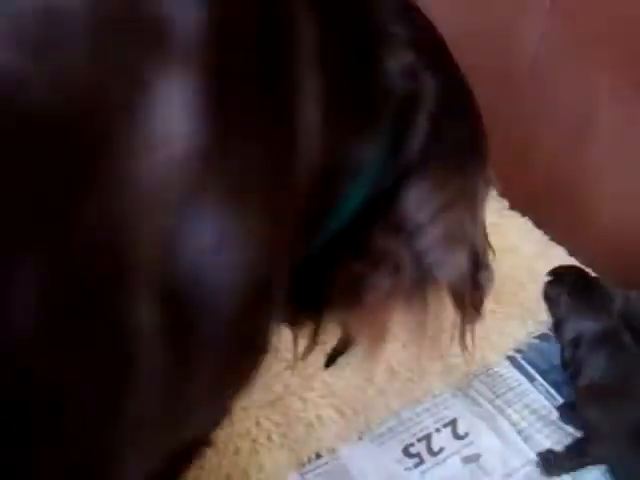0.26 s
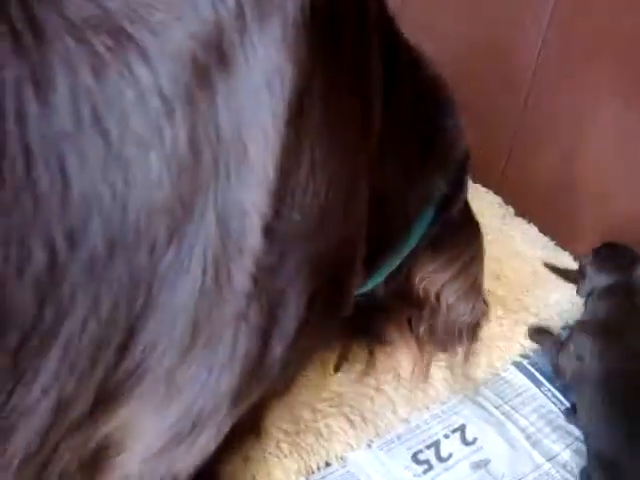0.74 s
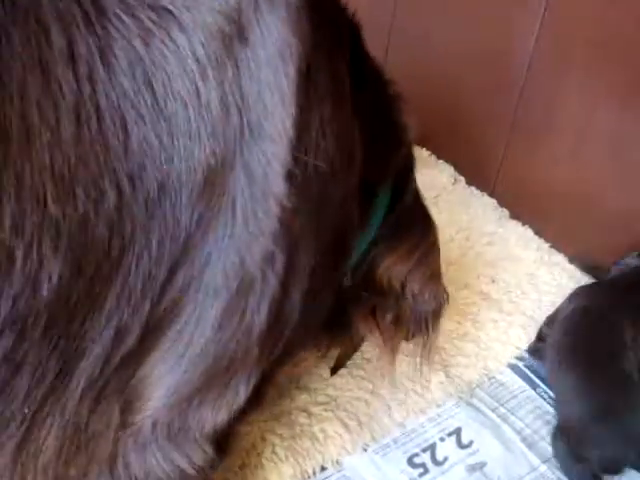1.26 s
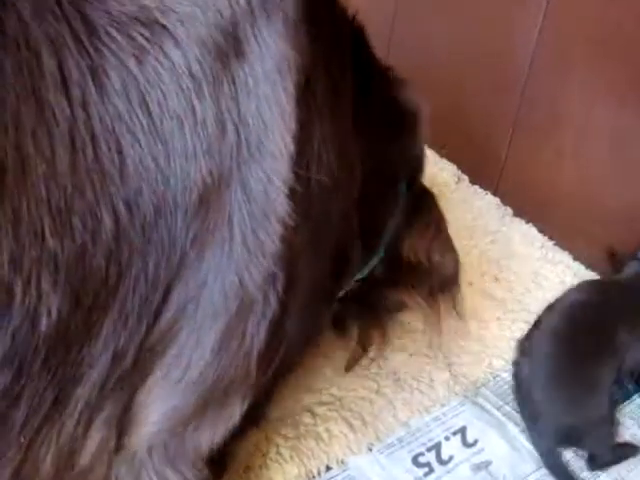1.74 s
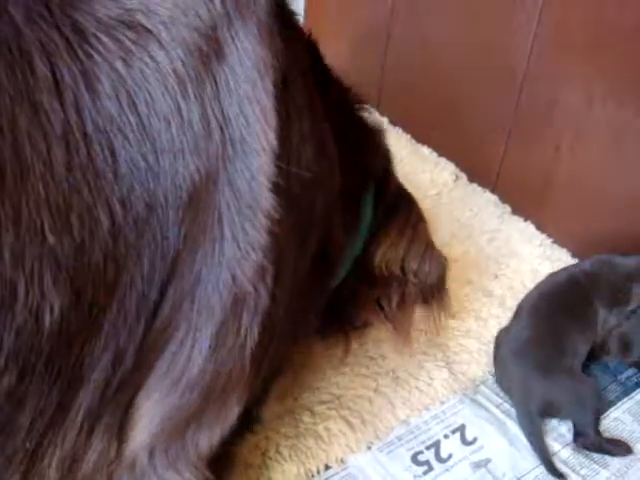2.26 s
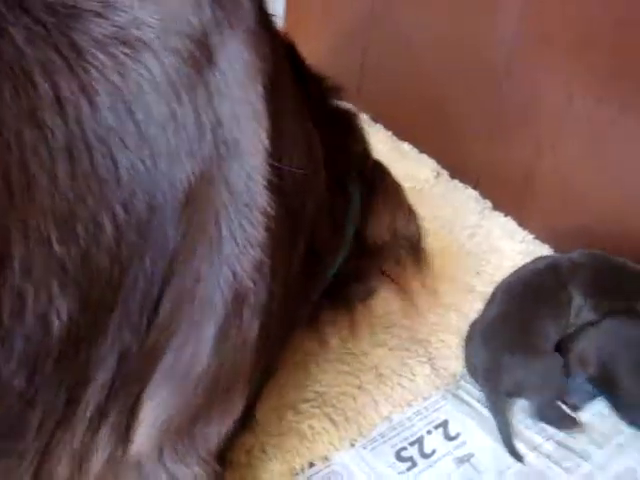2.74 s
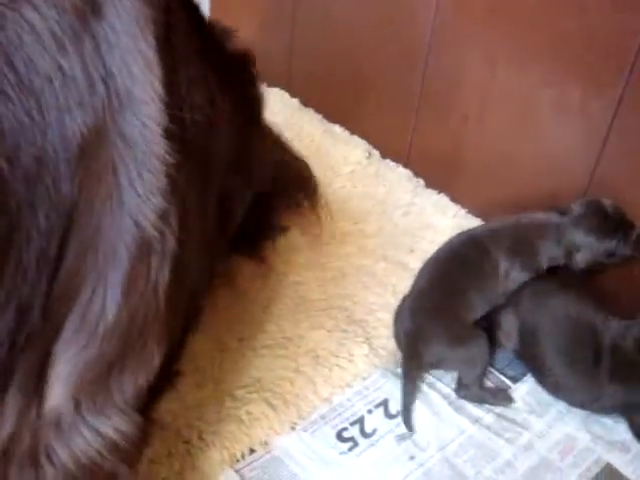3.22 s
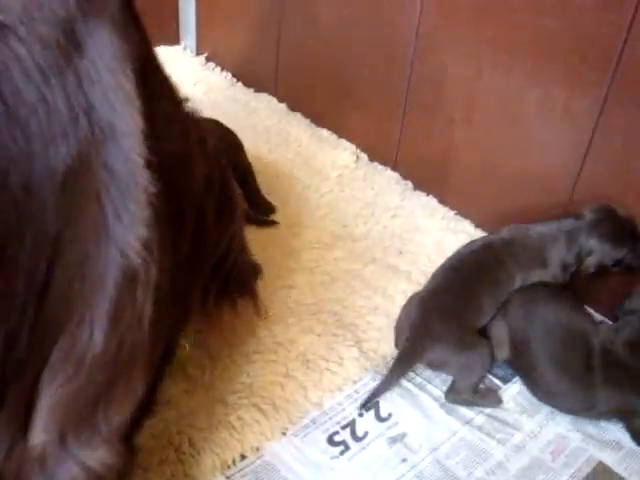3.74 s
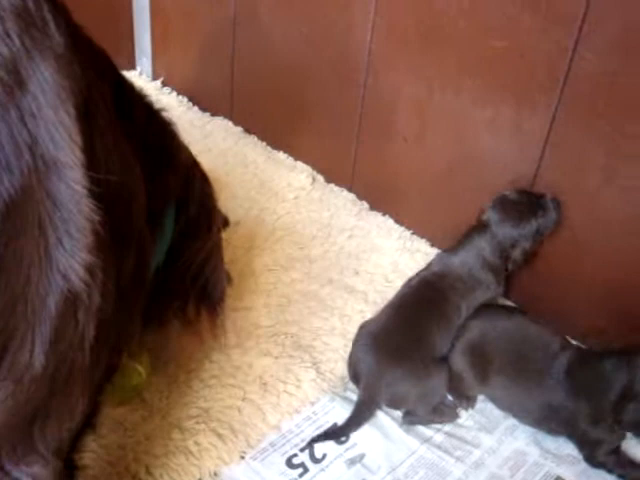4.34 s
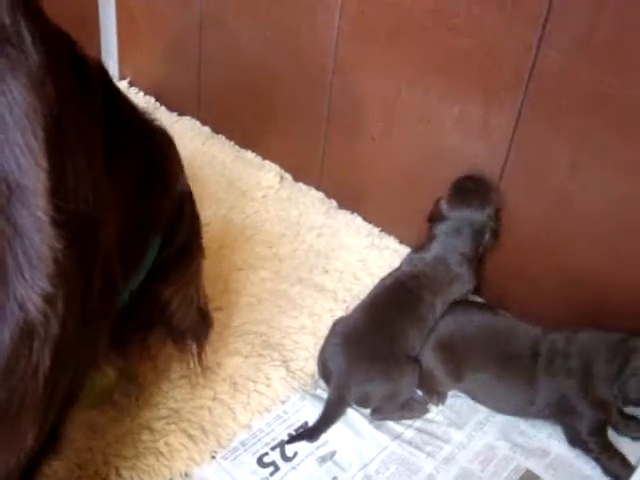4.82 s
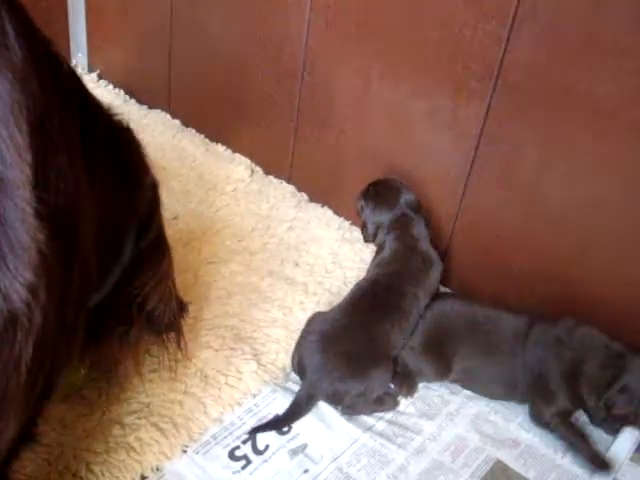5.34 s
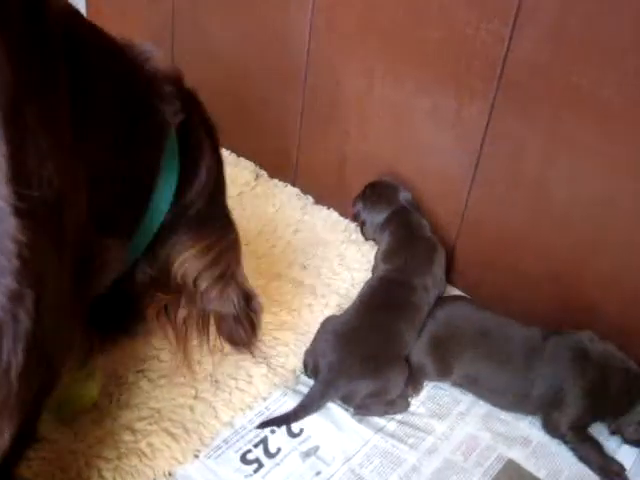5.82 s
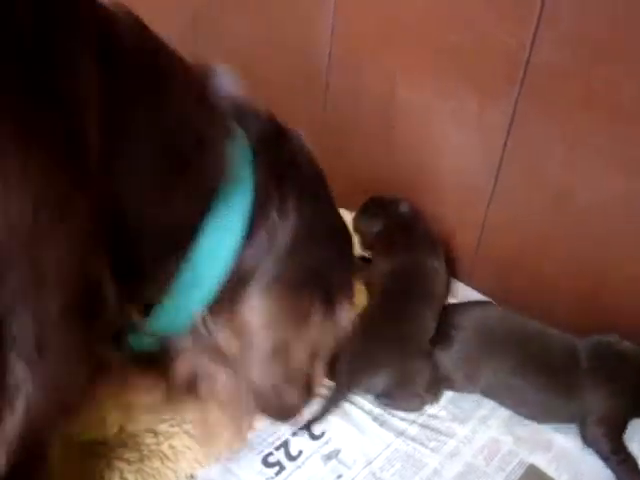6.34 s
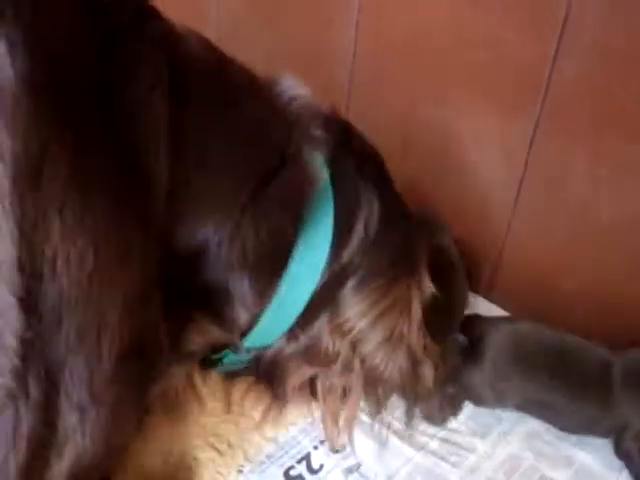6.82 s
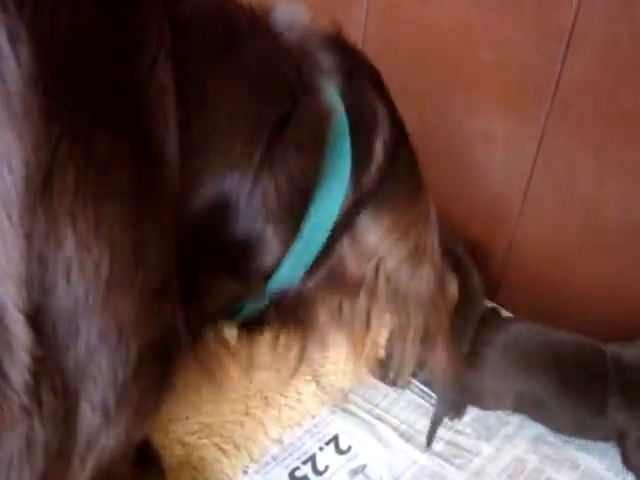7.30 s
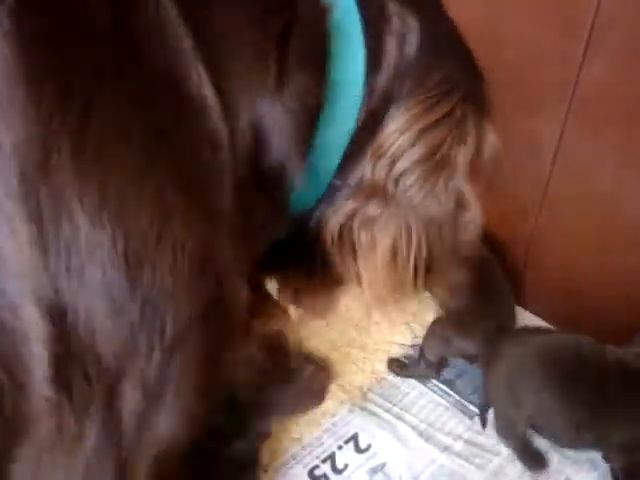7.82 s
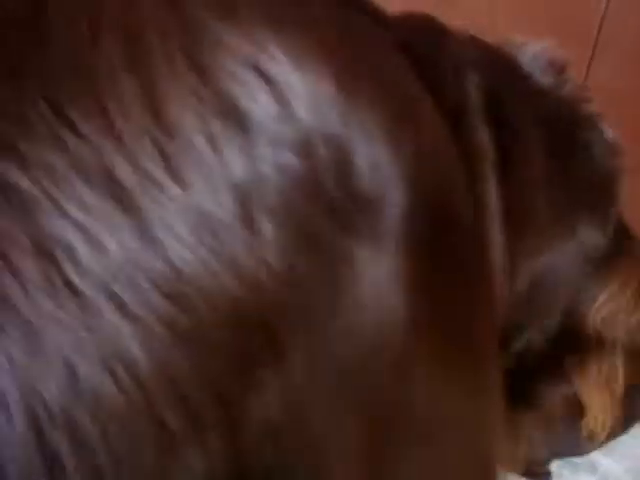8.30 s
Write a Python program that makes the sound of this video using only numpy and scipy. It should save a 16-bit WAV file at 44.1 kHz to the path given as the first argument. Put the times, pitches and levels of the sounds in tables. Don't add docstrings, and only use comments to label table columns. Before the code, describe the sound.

Close-up litter of tiny pups whining in unsteady high squeaks while fur, fleece and paper rustle and snap, a brief metal clink, then a loud yelp.

```python
import sys
import numpy as np
from scipy import signal
from scipy.fft import rfft, irfft, next_fast_len
from scipy.io import wavfile
from scipy.ndimage import uniform_filter1d, minimum_filter1d, map_coordinates

SR = 44100
rng = np.random.default_rng(int(sys.argv[2]) if len(sys.argv) > 2 else 0)


def invert_db(x):
    u = np.asarray(x, float) / 20
    return 10 ** u


def unload_wav(signal):
    wavfile.write(
        sys.argv[1],
        SR,
        np.round(np.clip(np.atleast_2d(signal).T, -1, 1) * 32767).astype(np.int16),
    )


N = 377496
TOP_HZ = 10200


def unit(x):
    return x / np.sqrt(np.mean(x ** 2) + 1e-20)


def along(points, hz):
    f, v = np.transpose(points)
    return np.interp(np.log(hz + 1), np.log(f + 1), v)


def wobble(rate_hz, size=N):
    knots = rng.standard_normal(int(size * rate_hz / SR) + 4)
    return map_coordinates(knots, [np.arange(size) * rate_hz / SR])


def filtered(x, response):
    m = next_fast_len(N + SR // 2)
    return irfft(rfft(x, m) * response(np.fft.rfftfreq(m, 1 / SR)), m)[..., :N]


def level(rows):
    return invert_db(np.interp(np.arange(N) / SR, *np.transpose(rows)))


def rush(spectrum, patchy_db, grit_db):
    z = signal.stft(rng.standard_normal(N + 512), nperseg=512)[2]
    field = uniform_filter1d(rng.standard_normal(z.shape), size=8, axis=0)
    field = uniform_filter1d(field, size=5, axis=1)
    patches = invert_db(patchy_db * np.clip(unit(field), -2, 2))
    noise = signal.istft(z * patches, nperseg=512)[1][:N]
    return unit(filtered(noise * invert_db(grit_db * wobble(700)), lambda hz: invert_db(along(spectrum, hz))))


# pitch_hz [Hz], level_db [dB]
SECOND = [(260, -2.5), (400, 2.5), (570, 4), (750, -6.5), (1000, -8.5), (1200, -21), (1500, -16.5)]


def unfold(calls, shape, thin_db=0):
    when, way, under_db = np.transpose(shape)
    out = []
    for start_s, length_s, peak_db, from_hz, to_hz in calls:
        hz = from_hz + way * (to_hz - from_hz)
        second_db = along(SECOND, hz) + thin_db
        out.append(np.transpose([start_s + when * length_s, hz, peak_db + under_db, second_db]))
    return out


# centre_s [s], spread_s [s], level_db [dB]
EXTRA_BRIGHT = [
    (2.0, 0.066, -8),
    (4.66, 0.099, -10),
    (6.92, 0.035, 1),
    (7.258, 0.031, 10),
]


def extra_bright_db(t):
    return sum(db * np.exp(-((t - s) / spread_s) ** 2) for s, spread_s, db in EXTRA_BRIGHT)


# centre_s [s], spread_s [s], hoarseness [0-1]
HOARSE = [(.02, .04, .6), (.15, .03, 1), (1.86, .04, .7), (2.05, .025, .7), (2.66, .03, .5), (3.0, .05, 1),
          (3.24, .055, .9), (3.49, .02, .6), (4.12, .03, .5), (4.4, .03, .5), (4.77, .015, .25),
          (5.12, .03, .4), (5.41, .05, .5), (6.25, .015, .3), (6.89, .03, .45), (2.0, .04, .2),
          (4.38, .06, .2), (5.06, .07, .3), (7.545, .05, .7), (8.345, .025, .8)]
# freq_hz [Hz], level_db [dB]
NOSE_RING = [(3000, -70), (4300, -44.5), (5000, -32), (5600, -23), (6500, -42.5), (8800, -31), (10000, -49)]


def cry(rows, throat, soft_db):
    s, hz, db, second_over_db = np.transpose(rows)
    t = np.arange(s[0] - .003, s[-1] + .037, 1 / SR)
    size = len(t)
    first_db = np.interp(t, s, db)
    second_db = np.interp(t, s, second_over_db)
    low_db = np.maximum(second_db, 0)
    pitch = uniform_filter1d(np.interp(t, s, hz), size=300)

    strain = np.clip(pitch / 200 - 5.3, 0, 1) * np.clip((first_db + low_db + 29) / 6, 0, 1)
    pitch *= 1 + .012 * wobble(55, size) + (.011 + .04 * strain) * wobble(300, size)
    hoarse = sum(depth * np.exp(-((t - at) / spread_s) ** 2) for at, spread_s, depth in HOARSE)
    pitch *= 1 + .075 * hoarse * wobble(400, size)
    phase = 2 * np.pi * np.cumsum(pitch) / SR
    effort = uniform_filter1d(np.clip((first_db + 30) / 18, 0, 1), size=1300)

    k = np.arange(1, 17)[:, None]
    soft = np.clip((-24 - first_db - low_db) / 10, 0, 1)
    partial_db = second_db + along(throat, k * pitch) - along(throat, 2 * pitch)
    partial_db -= (2.5 + soft_db * soft) * np.log2(k / 2)
    partial_db[0] = 0
    nose_db = low_db + 3.5 * (effort - .4) + extra_bright_db(t) + along(NOSE_RING, k * pitch)
    partial_db = np.maximum(partial_db, nose_db)
    flutter_db = 1.8 + (.25 + hoarse / 2) * np.minimum(k - 1, 5)
    partial_db += flutter_db * np.array([wobble(150, size) for _ in k])
    waves = np.sin(k * phase + rng.uniform(0, 2 * np.pi, k.shape))
    voice = np.sqrt(2) * np.sum(invert_db(partial_db) * (k * pitch < TOP_HZ) * waves, axis=0)

    rasp = 1 + (.055 + .0065 * effort + .35 * hoarse) * wobble(900, size)
    edges = np.clip((t - t[0]) / .002, 0, 1) * invert_db(-1500 * np.clip(t - s[-1], 0, None))
    return max(round(t[0] * SR), 0), voice * rasp * invert_db(first_db) * edges


# start_s [s], length_s [s], peak_db [dB], from_hz [Hz], to_hz [Hz] (last pitch; top if arching)
GRUNTS = [(.23, 0.035, -33, 287, 282), (.86, 0.063, -32, 314, 245.6), (1.3, 0.046, -31.5, 302, 278.5),
          (1.84, 0.082, -26.5, 351, 269), (2.82, 0.082, -31.5, 330.5, 278), (3.87, 0.33, -33.5, 251, 289.7),
          (4.285, 0.12, -38, 271, 261), (4.6, 0.12, -40, 278, 275), (5.73, 0.05, -39, 246, 243)]
WHIMPERS = [(2.065, 0.065, -25, 365, 422), (2.334, 0.053, -24, 360, 443), (2.6, 0.08, -23.5, 389, 492.5),
            (3.64, 0.073, -26, 339, 382.6), (3.735, 0.049, -25, 381, 456), (4.31, 0.069, -27.5, 525, 585),
            (5.38, 0.12, -27.5, 289.2, 378.7)]
CLIMBS = [(4.05, 0.082, -24.5, 529, 622), (4.37, 0.087, -21.5, 709, 925), (4.782, 0.055, -18, 700, 789),
          (8.32, 0.059, -28, 422.5, 576)]
WHINES = [(0, 0.055, -26, 518.6, 470.5), (.43, 0.14, -34, 602, 400.4), (3.53, 0.097, -30.5, 453.7, 391),
          (4.1, 0.024, -18.5, 722, 714)]
SQUEALS = [(4.01, 0.073, -14.5, 729, 823)]
PEEPS = [(.135, 0.03, -30, 907, 942), (.13, .04, -24.5, 1450, 1343), (.31, 0.19, -29, 751, 1014),
         (.83, 0.092, -29, 780, 740), (1.49, 0.14, -26.5, 944, 917), (2.565, 0.11, -21.5, 801, 736),
         (5.945, 0.04, -25.5, 960, 1005), (6.055, 0.034, -17.5, 952, 999), (6.095, .035, -27.5, 978, 885),
         (6.24, 0.017, -25.5, 700, 748), (7.126, 0.033, -21.5, 742, 790), (7.515, 0.066, -2.5, 1536, 1575),
         (7.565, 0.073, -14.5, 1557, 1272), (8.288, 0.037, -18, 620, 764), (8.49, 0.04, -45, 694, 702)]
NASALS = [(2.135, 0.092, -40.5, 433, 366.5)]
# length_share [0-1], pitch_share [0-1], level_db [dB re peak]
GRUNT = [(0, 0.11, -2.5), (.4, 0.93, 4), (1, 0.96, -32)]
ARCH = [(0, 0, -0.5), (0.351, 0.61, 5.5), (0.651, 1, 0.5), (1, 0.926, 1)]
CLIMB = [(0, 0.0036, 4), (0.502, 0.7, 3.5), (0.999, 1, -7.5)]
WHINE = [(0, 0.053, 3), (.2, 0.22, -5.5), (0.698, .45, -1), (1.001, 1, -0.5)]
SQUEAL = [(0, 0.0035, -2), (0.251, 0.33, -3), (0.45, 0.81, 3), (0.751, 1, -4.5), (0.998, 0.61, -20)]
PEEP = [(0, 0.043, -4), (.45, 0.82, 2), (1, 0.91, -5)]
# time_s [s], pitch_hz [Hz], first_db [dB], second_db [dB]
LONG_CRIES = [
    [(1.585, 685, -69, -56), (1.593, 693, -29, -48), (1.605, 686, -49, -39), (1.619, 650, -28.5, -42),
     (1.639, 642, -38.5, -42), (1.649, 639, -35, -52), (1.667, 560, -35.5, -37.5), (1.72, 424, -44.5, -50)],
    [(1.925, 778, -36, -49), (1.933, 737, -24, -35.5), (1.975, 998, -22, -42), (1.987, 1007, -24.5, -33),
     (2.013, 1040, -29.5, -43), (2.025, 967, -24.5, -31), (2.049, 963, -38, -42), (2.06, 950, -48, -43)],
    [(2.9, 366, -28, -26.5), (2.912, 370, -30.5, -22.5), (2.938, 390.4, -18.5, -21),
     (2.948, 380, -29, -30.5), (2.958, 383, -40, -19), (2.98, 368.6, -29, -21.5),
     (3.004, 405, -25.5, -27.5), (3.03, 386, -37, -28)],
    [(3.07, 562, -28, -58), (3.1, 483, -39, -30.5), (3.166, 398, -33.5, -32.5), (3.22, 328.7, -39.5, -29.5),
     (3.234, 345, -36.5, -33), (3.25, 383, -22, -35.5), (3.266, 364, -27.5, -29.5), (3.3, 348, -43, -35.5)],
    [(3.31, 383, -35, -41), (3.33, 424.6, -28.5, -27), (3.366, 390, -30, -30.5), (3.408, 444, -37.5, -29),
     (3.43, 427.6, -31, -36), (3.446, 353, -30.5, -24), (3.48, 448.6, -25, -23), (3.5, 455, -26.5, -31)],
    [(4.593, 420.6, -45, -31.5), (4.617, 427, -49, -24.5), (4.657, 449.7, -36, -28.5),
     (4.699, 489.5, -33, -23.5), (4.715, 465, -27, -35.5), (4.723, 439.7, -44, -22.5),
     (4.749, 355, -33, -26), (4.775, 326, -34, -28)],
    [(4.962, 288.1, -47, -42), (4.978, 319.4, -35, -32.5), (5.012, 394.7, -33, -28.5),
     (5.05, 459, -44, -31.5), (5.09, 438, -34.5, -27), (5.114, 390, -32, -27), (5.146, 496.5, -23.5, -23),
     (5.19, 501, -47, -43.5)],
    [(6.826, 461, -32.5, -28.5), (6.844, 479, -27, -20.5), (6.864, 745, -15.5, -25), (6.87, 816, -11, -20),
     (6.882, 880, -17, -26), (6.902, 999, -12.5, -34), (6.934, 948, -20.5, -33), (6.96, 882.5, -28, -49)],
    [(7.125, 492.5, -37.5, -44), (7.149, 511.5, -26, -20), (7.163, 547, -36.5, -30),
     (7.185, 774.5, -9.5, -18.5), (7.217, 805.5, -22.5, -19.5), (7.233, 994, -10.5, -33.5),
     (7.275, 1079, -26, -32), (7.3, 1074, -18.5, -45)],
    [(8.36, 622.8, -30, -34), (8.374, 704, -17.5, -25), (8.392, 727, -26.5, -33), (8.402, 753, -19, -29.5),
     (8.416, 713, -17.5, -39), (8.424, 696, -19.5, -23), (8.456, 716, -27, -38), (8.47, 704, -39, -51)],]
SHRIEKS = [
    [(0.895, 603.5, -35, -38.5), (0.985, 518, -43, -39.5), (1.019, 552.3, -37.5, -44),
     (1.063, 490, -46, -37), (1.123, 486, -39, -36), (1.205, 338.5, -43.5, -38), (1.225, 322.2, -49, -69)],
    [(5.64, 652, -31.5, -35), (5.666, 757, -17.5, -19.5), (5.694, 948, -17.5, -31.5),
     (5.718, 1100, -17.5, -31), (5.742, 1124, -16, -32.5), (5.762, 1124, -25, -38),
     (5.785, 1070, -27.5, -43)],
    [(5.94, 736, -34, -41), (5.95, 710.5, -18.5, -21), (5.964, 677.5, -32, -34), (5.994, 740, -19.5, -17),
     (6.008, 825, -13.5, -19), (6.02, 881, -22, -20), (6.085, 850, -20, -31)],
    [(6.24, 435, -35, -27), (6.246, 442, -34.5, -23.5), (6.264, 472, -22, -25.5), (6.278, 491, -22.5, -31),
     (6.284, 467, -32, -19), (6.296, 454, -30, -46), (6.32, 473, -44.5, -27)],
    [(7.888, 343.2, -39, -30.5), (7.96, 553.7, -24, -25), (8.0, 553.5, -28.5, -20.5),
     (8.03, 570, -38.5, -27.5), (8.056, 707, -21, -23), (8.078, 724, -21, -27), (8.09, 662, -33, -47)],
]
ANSWERS = [
    [(1.975, 1270, -44, -38), (1.987, 1158, -16, -27.5), (2.005, 1264, -27.5, -29.5),
     (2.027, 1142, -39.5, -34.5), (2.06, 1054, -26, -52)],
    [(3.045, 780, -24, -44), (3.065, 597, -27, -33), (3.093, 612, -32, -27.5), (3.127, 660, -17.5, -31.5),
     (3.135, 670, -54, -60)],
    [(6.915, 813, -25, -22), (6.927, 733, -7.5, -16.5), (6.937, 709, -26.5, -24), (6.955, 696, -27, -30),
     (6.97, 668, -45, -24)],
]
# time_s [s], pitch_hz [Hz], first_db [dB], second_over_first_db [dB]
YELP = [(7.47, 739, -22, 1), (7.485, 748, -5, -2.5), (7.495, 802, -16.5, 2), (7.52, 1171, -1.5, -8),
        (7.55, 1288, -30, 22.5), (7.59, 1365, -31.5, 7), (7.65, 1229, -29, -7.5),
        (7.74, 1210, -25.5, -16.5), (7.78, 1234, -23, -15), (7.83, 1140, -64, -8)]
# freq_hz [Hz], level_db [dB]
THROAT = [(800, 9), (1200, 3.5), (1600, 6), (2100, -9), (2700, -17.5), (4500, -44), (5800, -22),
          (10000, -63)]
OPEN_MOUTH = [(1200, 20), (2000, -2.5), (2600, -11.5), (3300, -21.5), (4000, -20), (5000, -9.5),
              (6000, -17), (10000, -49)]


def voices():
    kinds = [(GRUNTS, GRUNT), (WHIMPERS, ARCH), (CLIMBS, CLIMB), (WHINES, WHINE), (SQUEALS, SQUEAL),
             (PEEPS, PEEP, -15), (NASALS, WHINE, 14.5)]
    calls = [rows for kind in kinds for rows in unfold(*kind)]
    for rows in [*LONG_CRIES, *SHRIEKS, *ANSWERS]:
        calls.append([(s, hz, db + 5, second_db - db) for s, hz, db, second_db in rows])
    out = np.zeros(N + SR)
    for call in [(rows, THROAT, 10.5) for rows in calls] + [(YELP, OPEN_MOUTH, 0)]:
        start, sound = cry(*call)
        out[start:start + len(sound)] += sound
    return out[:N]


# freq_hz [Hz], density_db [dB/Hz]
CRY_HISS = [(200, -50), (600, -18), (1600, -12), (2300, -18), (4700, -24), (5500, -9), (6500, -11),
            (9800, -13)]


def cry_hiss(voice):
    bright = filtered(voice, lambda hz: hz > 850)
    push = np.abs(uniform_filter1d(bright ** 2, size=700)) ** .41
    push *= invert_db(extra_bright_db(np.arange(N) / SR))
    return invert_db(-16) * push * rush(CRY_HISS, patchy_db=1.4, grit_db=3.2)


def puppies():
    voice = voices()
    return filtered(voice + cry_hiss(voice), lambda hz: 1 / (1 + (210 / (hz + 1)) ** 6))


# freq_hz [Hz], t60_s [s]
BOX = [(300, .2), (1000, .25), (2500, .17), (8000, .1)]


def box(x):
    block = SR // 3
    out = np.zeros(N + 2 * SR)
    fade = np.hanning(2 * block)
    padded = np.pad(x, (block, 2 * block))
    for start in range(-block, N, block):
        hz, t, z = signal.stft(rng.standard_normal(SR // 2), SR, nperseg=256)
        tail = signal.istft(z * invert_db(-60 * t / along(BOX, hz)[:, None]), SR, nperseg=256)[1]
        piece = padded[start + block:][:2 * block]
        wet = signal.fftconvolve(piece * fade[:len(piece)], tail / np.linalg.norm(tail))
        out[start + block:][:len(wet)] += wet
    return np.pad(out[block:], (90, 0))[:N]


# freq_hz [Hz], density_db [dB/Hz]
RUMBLE = [(15, -30.5), (40, -7.5), (100, 6), (160, 0), (250, -5), (400, -103)]


def low_swell(litter):
    push = np.sqrt(np.abs(uniform_filter1d(litter ** 2, size=1500)))
    return invert_db(-57) * push * rush(RUMBLE, patchy_db=-1.0, grit_db=4.0)


# start_s [s], peak_db [dB]
BUMPS = [
    (0, -64),
    (.25, -51.5),
    (.7, -48),
    (6.015, -68),
    (6.86, -51),
    (8.0, -47),
]


def rumble():
    t = np.arange(N) / SR
    knocks = sum(invert_db(db - 60 * np.abs(t - s) / .47) * (t > s) for s, db in BUMPS)
    return (invert_db(-77.5 + 1.5 * wobble(2.3)) + knocks) * rush(RUMBLE, patchy_db=2.0, grit_db=1.0)


# freq_hz [Hz], level_db [dB]
WHISTLE = [(7881, -72)]


def electric_whine():
    t = np.arange(N) / SR
    return sum(np.sqrt(2) * invert_db(db + 2 * wobble(7.8)) * np.sin(2 * np.pi * hz * t) for hz, db in WHISTLE)


# freq_hz [Hz], density_db [dB/Hz]
FUR = [(59, -65), (100, -24.5), (638, -10), (1070, -0.5), (1880, -7), (2710, -2.5), (7260, -1.5),
       (10100, -9), (13100, -51), (22000, -120)]
# freq_hz [Hz], density_db [dB/Hz]
THUD = [(40, -59), (100, -12), (300, 7), (1000, -2), (1800, 1), (2500, 1.5), (4000, -77)]
# start_s [s], peak_db [dB], t60_s [s], thud_db [dB]
SNAPS = [(0.0044, -22.5, 0.22, 2.5), (0.133, -17.5, 0.17, -4.5), (0.228, -19, 0.77, -18),
         (0.29, -13, 0.056, -1), (1.09, -23, 0.079, -25), (0.7, -24.5, 0.15, 1.5),
         (0.848, -23.5, 0.077, -12), (1.3025, -48, 0.12, -3), (1.3478, -26, 0.39, -39),
         (1.538, -36, 0.067, -19), (1.82, -25.5, 0.23, -9), (2.2607, -29, 0.25, -26),
         (2.5272, -12.5, 0.17, -6.5), (2.81, -17, 0.093, -4), (3.47, -27.5, 0.25, -18),
         (4.2856, -23, 0.076, 1), (4.383, -28.5, 0.38, -31), (4.81, -27.5, 0.27, -25),
         (4.86, -23.5, 0.17, -11), (5.182, -25, 0.14, -1), (5.3662, -21, 0.24, -21.5),
         (6.671, -33.5, 0.15, -1), (7.083, -34, 0.047, -12), (6.862, -13.5, 0.18, -18),
         (7.273, -15.5, 0.11, -24), (7.35, -26.5, 0.66, -32), (8.328, -17, 0.18, -29),
         (7.523, -24.5, 0.066, 10), (7.799, -22.5, 0.21, -30), (7.956, -21, 0.28, -21),
         (8.013, -5.5, 0.13, -6), (8.153, -24.5, 0.073, -1)]


def snaps():
    t = np.arange(N) / SR
    crisp, dull = np.zeros(N), np.zeros(N)
    for s, db, t60_s, thud_db in SNAPS:
        part = slice(round(s * SR), round(s * SR) + SR // 2)
        age = t[part] - s
        burst = invert_db(db - 4.5 - 60 * age / max(t60_s, .01)) * (1 - np.exp(-np.abs(age) / .009))
        crisp[part] += burst
        dull[part] += invert_db(thud_db) * burst
    return crisp * rush(FUR, patchy_db=2.5, grit_db=.5) + dull * rush(THUD, patchy_db=3.0, grit_db=2.5)


# freq_hz [Hz], density_db [dB/Hz]
FLEECE = [(24, -63), (40, -35), (151, -11.5), (291, 7), (603, 6), (769, 12.5), (1250, 1.5), (1600, 6),
          (3500, -6.5), (4550, -85), (7700, -120)]


def shuffle(stir):
    return invert_db(-50) * unit(stir ** .51) * rush(FLEECE, patchy_db=4.0, grit_db=2.0)


# time_s [s], level_db [dB]
STIRRING = [(0, -39.5), (.45, -42.5), (.66, -45), (1.28, -50), (1.4, -43), (1.75, -45.5), (2.48, -52),
            (2.8, -41), (3.6, -54), (4.5, -48), (4.9, -52), (5.33, -47.5), (6.2, -44), (6.6, -51),
            (7.35, -44.5), (7.85, -46), (8.1, -37.5), (8.56, -41)]
# time_s [s], level_db [dB]
HUSH = [
    (7.58, 5),
    (7.64, -12),
    (7.77, -7),
    (7.83, -4),
]


def bedding():
    stir = level(STIRRING)
    hiss = stir * rush(FUR, patchy_db=1.3, grit_db=2.2)
    return hiss + snaps() + level(HUSH) * (rumble() + shuffle(stir))


# start_s [s], peak_db [dB], pitch_hz [Hz]
TICKS = [(0.231, -13, 4610), (0.5895, -25, 4630), (0.7022, -18, 2740), (0.8455, -22, 7000),
         (1.0823, -29, 5940), (1.3517, -14.5, 6920), (1.614, -27.5, 4550), (1.82, -24, 5700),
         (1.837, -17.5, 2645), (2.2017, -23.5, 2470), (2.263, -25, 5220), (2.5323, -31, 2850),
         (2.8105, -38, 2700), (3.466, -20, 5430), (4.2846, -23, 3070), (4.3902, -15, 5100),
         (5.183, -23, 5170), (5.37, -11.5, 5200), (5.534, -25.5, 4960), (5.971, -26, 5600),
         (6.101, -21.5, 3760), (7.955, -27, 2800), (7.981, -16, 5350), (8.0144, -9.5, 3680),
         (8.156, -19, 5650), (8.1818, -22.5, 3220)]


def ticks():
    out, t = np.zeros(N + SR), np.arange(SR // 10) / SR
    for s, db, hz in TICKS:
        puff = uniform_filter1d(rng.standard_normal(len(t)), size=9) * np.sin(2 * np.pi * hz * t)
        out[round(s * SR):][:len(t)] += invert_db(db - 8.5 - 60 * t / .052) * unit(puff)
    return out[:N]


# start_s [s], peak_db [dB]
CLINKS = [
    (6.672, -20),
    (6.681, -26.5),
    (6.6894, -30),
    (6.706, -33),
    (7.0838, -33.5),
    (7.8066, -28),
]
# freq_hz [Hz], level_db [dB], t60_s [s]
TAG = [(747, -19, 0.17), (2080, -11.5, 0.12), (3043, -10.5, 0.29), (4130, 3, 0.041), (5170, -17, 0.17),
       (6218, -32, 0.16)]


def collar_tag():
    out, t = np.zeros(N + SR), np.arange(SR // 10) / SR
    for s, db in CLINKS:
        ring = np.zeros(len(t))
        for hz, mode_db, t60_s in TAG:
            decay_db = mode_db + rng.normal(0, 3.1) - 60 * t / np.clip(t60_s, .02, .2)
            ring += invert_db(decay_db) * np.sin(2 * np.pi * hz * t)
        out[round(s * SR):][:len(t)] += invert_db(db - 8) * ring * (1 + 1.13 * wobble(500, len(t)))
    return out[:N]


def scene():
    litter = puppies()
    mix = invert_db(-5.0) * litter + invert_db(-9.5) * box(litter) + low_swell(litter)
    return (mix + electric_whine() + bedding() + ticks() + collar_tag())[None]


# time_s [s], above_hz [Hz]
DROPOUTS = [(.205, 4500), (.685, 2200), (.83, 5000), (1.33, 4400), (1.803, 3000), (2.515, 2800),
            (2.8, 3000), (4.275, 4500), (5.357, 3200), (5.93, 4500), (6.655, 3000), (7.475, 6000),
            (8.13, 5500)]


def narrow_band(x):
    hz, t, z = signal.stft(x[0], SR, nperseg=512, noverlap=384)
    hz = hz[:, None]
    luck = rng.random((len(hz) // 6 + 1, len(t) // 5 + 1))
    luck = np.kron(luck, np.ones((6, 5)))[:len(hz), :len(t)]
    lost = (luck < .06) & (hz > 4800)
    for s, above_hz in DROPOUTS:
        lost |= (luck < 2800 / above_hz) & (hz > above_hz) & (abs(t - s) < .011)
    return signal.istft(z * ~lost * (hz < TOP_HZ), SR, nperseg=512, noverlap=384)[1][None, :N]


def roll_off(x):
    return signal.sosfilt(signal.butter(12, 15800, fs=SR, output="sos"), x)


def record(dry):
    room_left = minimum_filter1d(.73 / np.maximum(abs(dry), .73), size=301)
    x = narrow_band(dry * uniform_filter1d(room_left, size=151))
    return roll_off(np.clip(x, -.69, .69))


dry = scene()
out = record(dry)
unload_wav(out)
```